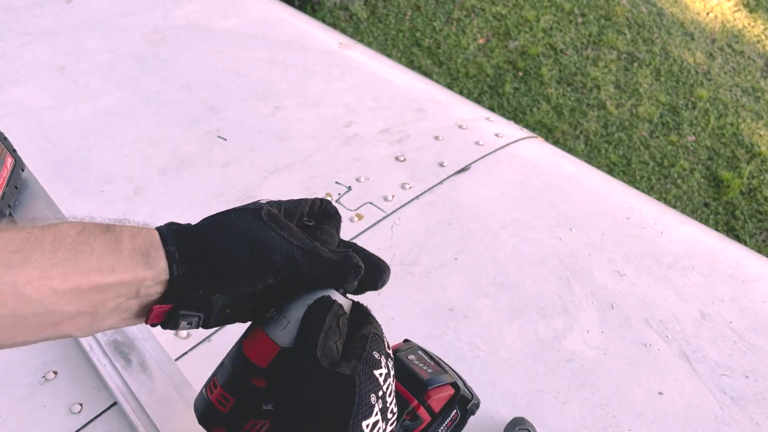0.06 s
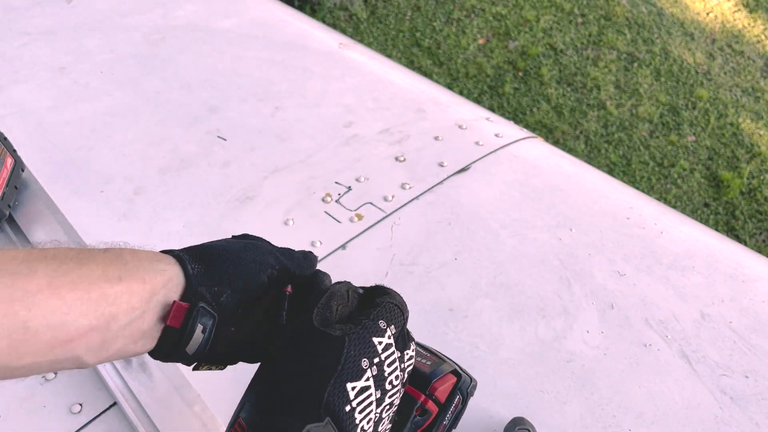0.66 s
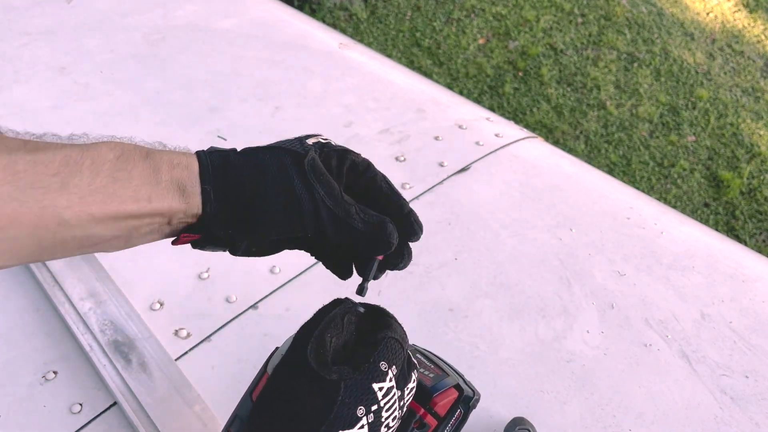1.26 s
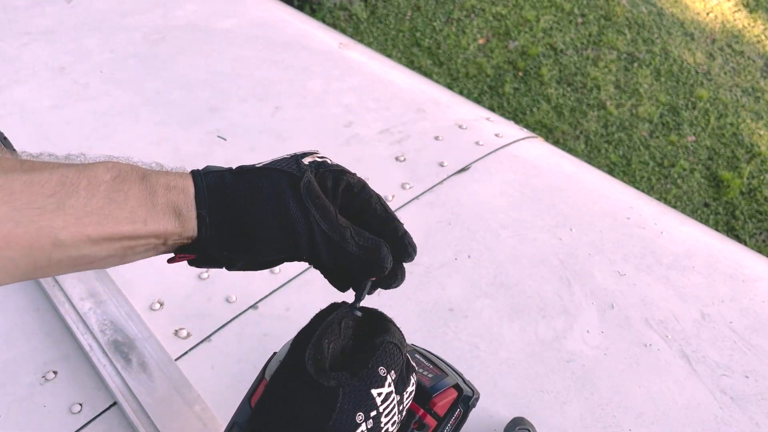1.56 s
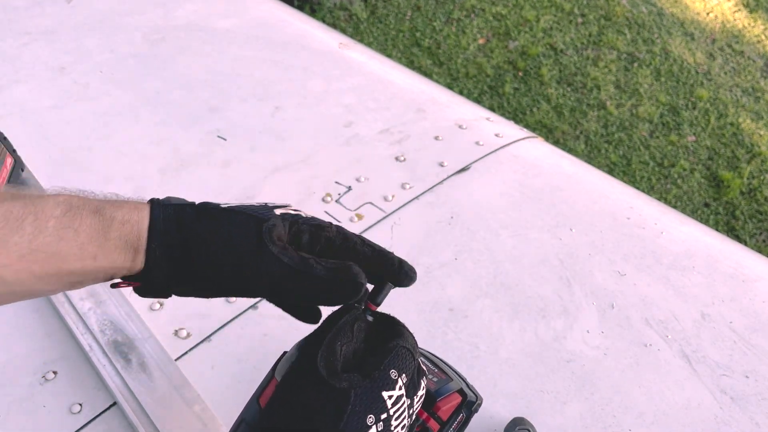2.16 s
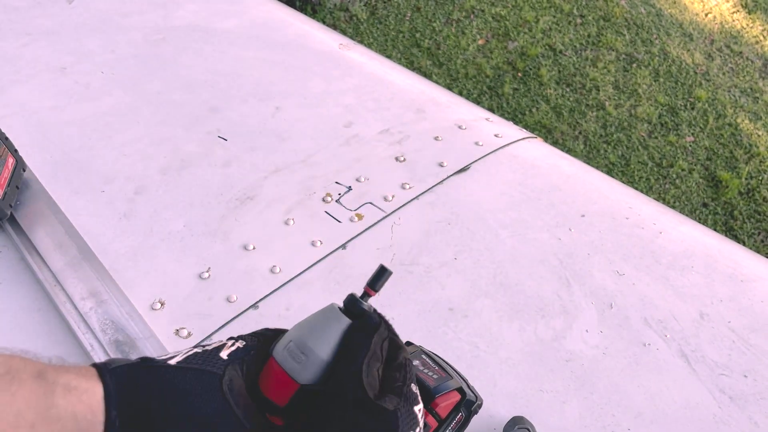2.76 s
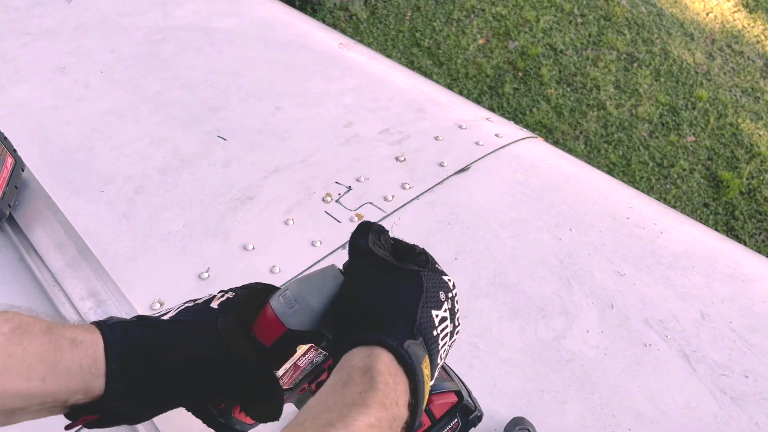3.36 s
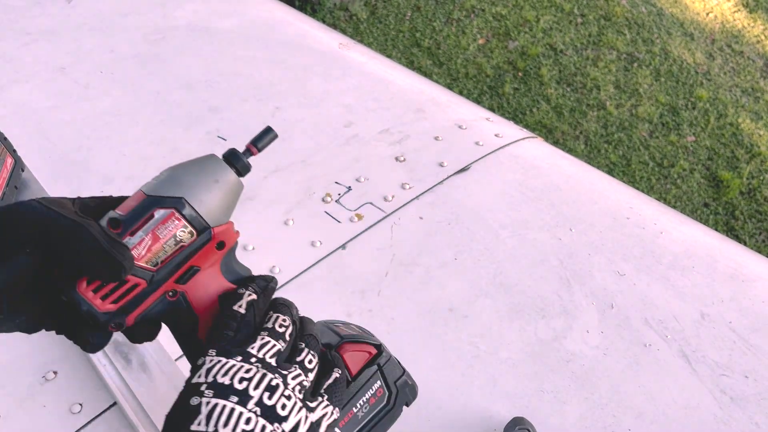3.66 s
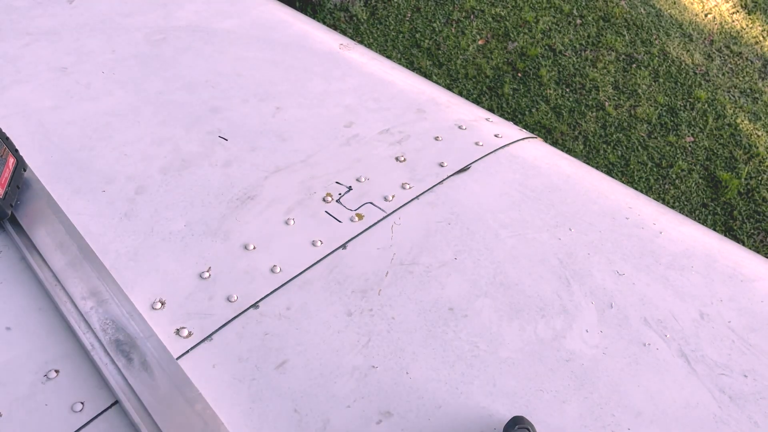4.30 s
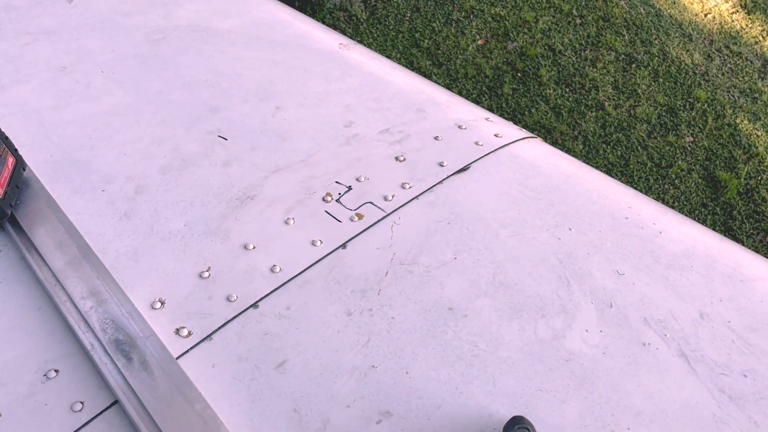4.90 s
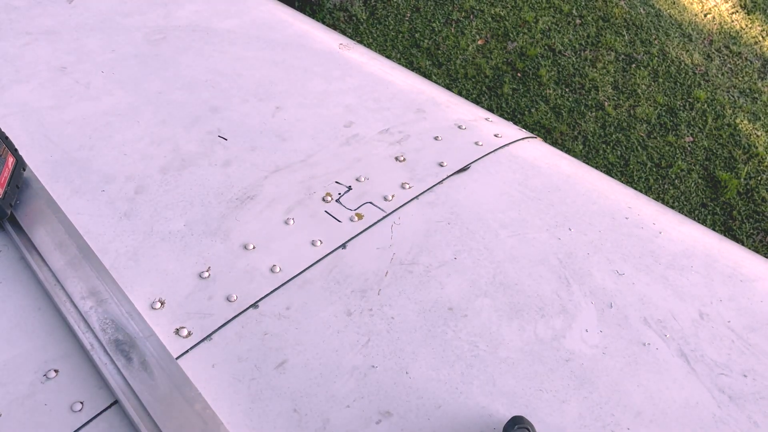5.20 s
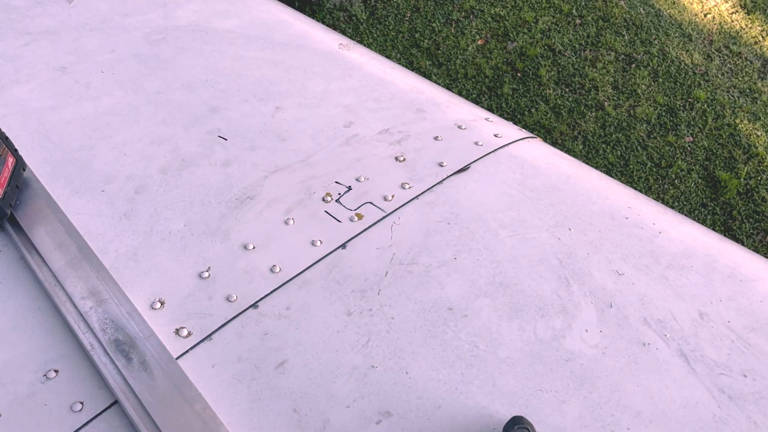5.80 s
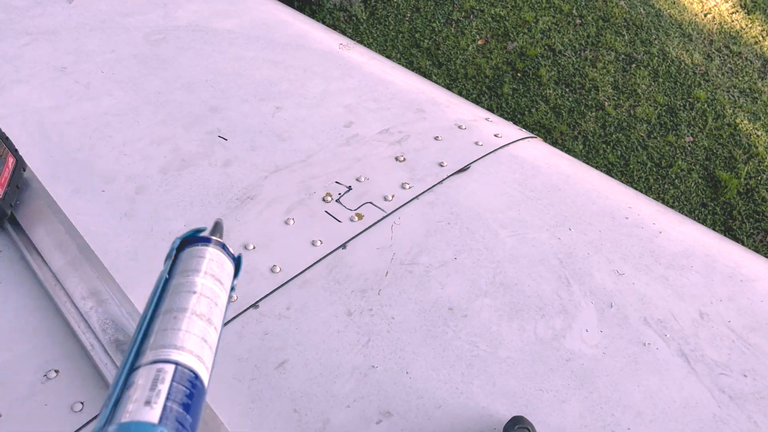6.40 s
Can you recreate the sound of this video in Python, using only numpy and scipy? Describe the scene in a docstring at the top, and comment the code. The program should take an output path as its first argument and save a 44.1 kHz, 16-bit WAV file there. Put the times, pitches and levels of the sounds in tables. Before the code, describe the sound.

Close, low thuds and cloth rubbing run throughout as someone moves on a metal roof, heard through the panel itself. Slightly left, small steel clicks and a bright snap mark an adapter locking into a cordless driver. The tool later knocks down heavily on the sheet, and a caulking gun is lifted, rattling, ending in a sharp snap and hollow ring. Soft outdoor air and a faint cricket lie behind.

```python
"""A quiet garden with a trilling cricket lies behind a sheet-metal roof. A cordless impact driver knocks on
the panel; gloves and sleeves rustle, and every shift of weight sends dull bumps through the roof into the
microphone standing on it. From 1.5 s a socket adapter clicks into the steel chuck and the sleeve snaps
shut; thin whistles drift in from afar. Near 4.7 s the driver is laid down and the sheet buzzes. Under faint
far calls a caulking gun is lifted, rattling; from 6 s its catch snaps and its plunger hits the cartridge."""
import sys
import numpy as np
from scipy import signal
from scipy.fft import rfft, irfft
from scipy.io import wavfile
from scipy.ndimage import uniform_filter1d

SR = 44100
rng = np.random.default_rng(int(sys.argv[2]) if len(sys.argv) > 2 else 0)


def generate_wav(sig):
    """Save sig (samples, or channels by samples) to the path in sys.argv[1] as 16-bit PCM at SR."""
    pcm = np.round(np.clip(np.atleast_2d(sig).T, -1, 1) * 32767).astype(np.int16)
    wavfile.write(sys.argv[1], SR, pcm)


N = 284445


def amp(db):
    """Decibels to gain."""
    return 10 ** (np.asarray(db) / 20)


def unit_rms(x):
    """Scales to rms 1."""
    return x / np.sqrt(np.mean(x ** 2) + 1e-20)


def curve(points, hz):
    """Reads a table of (frequency, value) on a log-frequency axis."""
    f, value = np.transpose(points)
    return np.interp(np.log(hz + 1), np.log(f + 1), value)


def add(mix, s, sound):
    """Mixes a sound in at time s."""
    start = max(round(s * SR), 0)
    part = mix[..., start:start + sound.shape[-1]]
    part += sound[..., :part.shape[-1]]


def band(x, lo_hz, hi_hz, order=2):
    """Causal band-pass."""
    return signal.sosfilt(signal.butter(order, [lo_hz, hi_hz], "band", fs=SR, output="sos"), x)


def drift(smooth_samples, n=N):
    """A smooth random modulator, rms 1."""
    return unit_rms(uniform_filter1d(rng.standard_normal(n), size=smooth_samples))


def swells(rows):
    """An envelope of smooth swells, from rows of middle t/s, length/s, level/dB."""
    t = np.arange(0, N, 64) / SR
    gain = sum(amp(db) * np.cos(np.pi * np.clip((t - middle) / length, -.5, .5)) ** 2
               for middle, length, db in rows)
    return np.interp(np.arange(N) / SR, t, gain)


def stereo_noise(colour):
    """Noise of a given spectrum, partly alike left and right."""
    # stereo image: f/Hz, left-right likeness
    image = [(60, 0.69), (130, 0.36), (280, 0.83), (600, -0.06), (1290, 0.36), (2770, 0.33), (5960, 0.47),
             (12800, 0.57)]
    hz = np.fft.rfftfreq(N, 1 / SR)
    mid, side = rfft(rng.standard_normal((2, N)))
    likeness = np.clip(curve(image, hz), 0, 1)
    pair = np.sqrt(1 + likeness) * mid + np.array([[1], [-1]]) * np.sqrt(1 - likeness) * side
    return unit_rms(irfft(pair * amp(curve(colour, hz)), N))


def narrow_noise(hz, width_hz):
    """A band of noise that follows the pitch curve hz, rms 1."""
    lowpass = signal.butter(2, width_hz, fs=SR, output="sos")
    hoarse = signal.sosfilt(lowpass, rng.standard_normal((len(hz), 2)) @ [1, 1j])
    return unit_rms((hoarse * np.exp(2j * np.pi * np.cumsum(hz) / SR)).real)


def strikes(hits, modes, crack_db, crack_t60, lo_hz, hi_hz, tail_db, tail_t60, gain_db=0):
    """Blows ring an object's modes; its many lesser modes give a crack and a short, softer tail."""
    out, t = np.zeros((2, N)), np.arange(SR // 3) / SR
    mode_hz, mode_db, t60 = np.transpose(modes)[:, :, None]
    octaves = np.log2(np.clip(np.fft.rfftfreq(len(t), 1 / SR), 300, 13000) / 3000)
    notes = amp(mode_db - 60 * t / t60) * np.sin(2 * np.pi * mode_hz * t)
    attack, fade = 1 - np.exp(-t / 0.00046), np.minimum(1, 20 * (1 - t / t[-1]))
    for s, db, tilt_db in hits:
        sign = rng.choice([-1, 1], mode_hz.shape)  # where the blow lands
        ring = (sign * notes).sum(0)
        grit = rng.standard_normal((3, len(t)))
        crack = unit_rms(band(grit[0], lo_hz, hi_hz)) * amp(crack_db - 60 * t / crack_t60)
        dull_grit = band(grit[0] + 0.46 * grit[1:], lo_hz / 2, hi_hz / 2, order=1)
        tail = unit_rms(dull_grit) * amp(tail_db - 60 * t / tail_t60)
        hit = np.roll((ring + crack + tail) * attack, len(t) // 400, axis=1)  # room for the tilt's pre-ring
        hit = irfft(rfft(hit) * amp(tilt_db * octaves), len(t))
        loudest = np.sqrt(2 * uniform_filter1d(hit.mean(0) ** 2, size=40).max())
        add(out, s - 1 / 1200, amp(db + gain_db) * hit / loudest * fade)
    return out


def bending_waves(jolts, dispersion=0.1274, rolloff=4.44, roughness=0.4, sway_hz=82, sway_octaves=0.51):
    """High bending waves outrun low ones, so each jolt arrives falling in pitch and ends in a low sway."""
    size = 2 ** 13
    out, f = np.zeros(N + size), np.fft.rfftfreq(size, 1 / SR) + 1
    for (s, db, hz, sway_db), chance in zip(jolts, rng.uniform(-1, 1, (400, 9))):
        path = dispersion * np.exp(.5 * chance[0])  # the delay is path / sqrt(f)
        centre_s = size / SR / 2 - path / np.sqrt(hz)
        travel = np.exp(-2j * np.pi * (2 * path * np.sqrt(f) + f * centre_s + chance[1]))
        slip_cycles = np.outer(f, 0.007255 * chance[3:6]) + chance[6:]  # lesser slips around the main one
        slips = 1 + roughness * np.exp(-2j * np.pi * slip_cycles).sum(1)
        low_cut = (f / hz) ** 2 / (1 + (f / hz) ** 2)
        knock = slips * low_cut / (1 + (f / (1.003 * hz)) ** rolloff) / (1 + (f / (3 * hz)) ** 4)
        sway = np.exp(-.5 * (np.log2(f / sway_hz) / sway_octaves + .5 * chance[2]) ** 2)
        for shape, peak_db in ((knock, db), (sway, sway_db)):
            wave = irfft(shape * travel, size)
            add(out, s, amp(peak_db) * wave / abs(signal.hilbert(wave)).max())
    return out[size // 2:][:N]


def through_sheet(slips, colour, dispersion):
    """The sheet colours each slip and smears it into a falling chirp; rms 1."""
    hz = np.fft.rfftfreq(N, 1 / SR)
    travel = np.exp(-4j * np.pi * dispersion * np.sqrt(hz))
    return unit_rms(irfft(rfft(slips) * amp(curve(colour, hz)) * travel, N))


def effort(attack_s=0.037, release_s=0.062):
    """How hard the body moves: each spell builds up, holds and settles."""
    # spells of moving about on the roof: t/s, length/s, level/dB
    moves = [(0.0, 0.08, -37), (0.311, 0.1, -49), (0.639, 0.5, -41), (1.16, 0.26, -44), (1.598, 0.22, -40),
             (1.845, 0.24, -46), (2.27, 0.04, -43), (2.45, 0.2, -34), (2.687, 0.05, -38),
             (2.967, 0.39, -42), (3.45, 0.58, -42), (4.33, 0.2, -52), (4.702, 0.39, -34.5),
             (5.15, 0.28, -44.5), (5.49, .22, -40), (5.77, .11, -37), (6.17, 0.19, -42)]
    t = np.arange(0, N, 64) / SR
    spells = [amp(db) * np.exp(np.minimum(t - s, 0) / attack_s - np.maximum(t - s - length, 0) / release_s)
              for s, length, db in moves]
    return np.interp(np.arange(N) / SR, t, np.max(spells, axis=0))


def garden(air_db=-51.5, insects_db=-62):
    """The bed: open air and a steady high chorus of far insects."""
    # colour of the air: f/Hz, level/dB
    air = [(35, -16.5), (65, 0), (110, -7), (290, -21), (380, -19), (520, -25), (800, -24), (1300, -31.5),
           (2200, -35), (4000, -35), (6050, -32.5), (6400, -27), (6800, -33.5), (7400, -29), (8500, -26.5),
           (9700, -55), (10800, -32.5), (12000, -65), (13000, -78)]
    # colour of the chorus: f/Hz, level/dB
    insects = [(6500, -43), (7700, -17), (8250, 5), (8550, 6.5), (8900, 3.5), (9500, 2.5), (9900, -6.5),
               (10300, -50), (11000, -76)]
    return amp(air_db) * stereo_noise(air) + amp(insects_db) * stereo_noise(insects)


def steel_rings():
    """A freely ringing steel part holds one dying note."""
    # notes: t/s, level/dB, f/Hz, t60/s
    notes = [(0, -24, 279.5, 0.22), (0, -39, 786, 0.27), (0, -57, 5340, 1.0), (3.141, -36.5, 1980, 0.018),
             (3.145, -51, 810, 0.086), (3.152, -24.5, 4640, 0.006), (3.152, -46, 4630, 0.048),
             (6.301, -41.5, 7100, 0.27), (6.302, -28, 5880, 0.051)]
    out, t = np.zeros(N), np.arange(SR) / SR
    for s, db, hz, t60 in notes:
        add(out, s, amp(db - 60 * t / t60) * np.sin(2 * np.pi * hz * t))
    return out


def driver_knocks():
    """The driver knocks on the roof, and tool and panel ring together."""
    # knocks: t/s, level/dB, tilt/(dB per octave)
    hits = [(0.001, -27.5, -0.5), (0.012, -17, -9.5), (0.033, -29, -10), (4.7213, -24, -4),
            (4.7677, -9, -4.5), (4.806, -18.5, -10), (4.819, -34, 3), (4.917, -29.5, -9.5),
            (4.9285, -23, -9.5), (4.9375, -19, -13)]
    # modes of driver and panel: f/Hz, level/dB, t60/s
    modes = [(210, -3, 0.22), (316, -7, 0.14), (346.3, -8.5, 0.34), (411, -16, 0.79), (476, 5, 0.042),
             (619, -1.5, 0.062), (733, -1, 0.052), (920, -3, 0.02), (1390, 17.5, 0.0094),
             (1670, -12, 0.017), (2710, 0.5, 0.086), (2745, -19.5, 0.019), (2960, 4.5, 0.045)]
    return strikes(hits, modes, crack_db=18.5, crack_t60=0.014, lo_hz=470, hi_hz=2580,
                   tail_db=3.5, tail_t60=0.25, gain_db=-2.5)


def cloth_rub(gain_db=-1, slips_per_s=110, spread_db=2.5, dull_hz=150, brighten_db=-41):
    """Cloth drags over the sheet in small slips above a low rumble; gentle dragging is duller."""
    # colour of the rub: f/Hz, level/dB
    colour = [(15, -69), (25, -13.5), (58, 5), (97, 2), (135, 1), (234, -8), (380, -14), (412, -25.5),
              (469, -23), (608, -30), (1200, -47.5), (1560, -77), (2640, -120)]
    hz, push = np.fft.rfftfreq(N, 1 / SR), effort()
    slips = rng.choice([-1, 1], N) * (rng.random(N) < slips_per_s / SR)
    strength = amp(spread_db * np.minimum(rng.exponential(1, N), 3))
    full = through_sheet(slips * strength, colour, dispersion=0.118) + 1.15 * stereo_noise(colour)
    dull = irfft(rfft(full) / (1 + (hz / dull_hz) ** 4), N)
    brightness = np.tanh(push / amp(brighten_db))
    return amp(gain_db) * push * (brightness * full + (1 - brightness) * dull)


def rustle(fabric_db=-2, grain=0.24):
    """Fabric brushes on fabric and the glove's rubber grip fizzes on the tool, both catching unevenly."""
    # strokes of glove and sleeve: middle t/s, length/s, level/dB
    brushes = [(.21, 0.88, -53.5), (2.025, 0.46, -56.5), (2.68, 1, -57), (3.25, 0.74, -57),
               (3.67, 0.99, -56), (4.42, 0.7, -58.5), (5.089, 0.39, -54), (5.784, 1, -54.5),
               (6.344, 0.85, -56.5)]
    # colour of the fabric: f/Hz, level/dB
    fabric_colour = [(600, 3), (1300, -6.5), (2000, -3), (2600, -1), (3500, -11.5), (4800, -0.5),
                     (6000, -9), (9000, -1.5), (11000, -20), (12500, -42), (13300, -62)]
    # fizzes of the grip: middle t/s, length/s, level/dB
    fizzes = [(.22, .4, -65), (.85, .6, -77), (2.66, .4, -74), (3.55, .95, -69.5)]
    # colour of the fizz: f/Hz, level/dB
    fizz_colour = [(8000, -19), (10300, -16), (11000, -2), (11500, 6), (12100, -6), (12700, -35),
                   (13300, -60)]
    catching = np.exp(grain * drift(300))
    fabric = amp(fabric_db) * swells(brushes) * stereo_noise(fabric_colour)
    grip = swells(fizzes) * stereo_noise(fizz_colour)
    return catching * (fabric + grip)


def lesser_bumps(per_s=22, usual_hz=239.6, usual_effort_db=-40, octaves_per_db=-0.16, sway_db=-6.5):
    """The moving body jolts the roof at uneven intervals; more effort makes it stronger and lower."""
    slots = np.arange(0, N / SR, 1 / per_s)
    timing, strength, detune = rng.uniform(-1, 1, (400, 3))[:len(slots)].T
    s = np.clip(slots + .5 * timing / per_s, 0, (N - 1) / SR)
    effort_db = 20 * np.log10(effort()[(s * SR).astype(int)])
    db = effort_db + 3.5 + 0.5 * strength
    hz = usual_hz * 2 ** (octaves_per_db * (effort_db - usual_effort_db) + 0.16 * detune)
    return bending_waves(np.transpose([s, db, hz, db + sway_db]))


def glove_slides(width_hz=400, rise_hz_per_s=800):
    """Ribbed glove fabric hisses as it slides, higher as it speeds up."""
    # slides: middle t/s, length/s, level/dB, f/Hz
    slides = [(.2, .35, -65, 5700), (3.69, .55, -63, 4800)]
    out, t = np.zeros(N), np.arange(N) / SR
    for middle, length, db, hz in slides:
        rising_hz = hz + rise_hz_per_s * np.clip(t - middle, -length, length)
        out += swells([(middle, length, db)]) * narrow_noise(rising_hz, width_hz)
    return out


def cricket(strokes_per_s=66, fall_hz=600, duty=0.55, unsteady=.03, waver_hz=90):
    """Each wing stroke scrapes out a short tone that sags in pitch; strokes come in swelling trills."""
    # trills: middle t/s, length/s, level/dB, f/Hz
    trills = [(.18, 0.26, -59.5, 8650), (0.677, 0.75, -63.5, 8560), (1.358, 0.79, -64, 8530),
              (2.235, 0.41, -61, 8540), (2.729, 0.49, -60.5, 8430), (3.32, 0.55, -62.5, 8580),
              (3.97, 0.66, -61.5, 8530), (4.503, 0.45, -64, 8430), (4.774, 0.3, -60, 8360),
              (5.363, 0.54, -61, 8600), (5.84, 0.39, -58.5, 8530), (6.23, 0.15, -63, 8650)]
    pace = strokes_per_s * (1 + unsteady * drift(60))
    stroke = np.cumsum(pace) / SR % 1 / duty  # the wing sounds from 0 to 1
    middle, _, _, pitch = np.transpose(trills)
    hz = np.interp(np.arange(N) / SR, middle, pitch) + fall_hz * (.5 - stroke) + waver_hz * drift(60)
    song = np.sin(np.pi * np.minimum(stroke, 1)) * np.sin(2 * np.pi * np.cumsum(hz) / SR)
    return swells([trill[:3] for trill in trills]) * unit_rms(song)


def firm_bumps():
    """Knees and tools thud on the roof and set the sheet swaying."""
    # bumps: t/s, level/dB, f/Hz, sway level/dB
    jolts = [(0.404, -40.5, 229, -46), (0.786, -15, 207, -35), (0.842, -19.5, 378, -47),
             (0.853, -17.5, 372, -20), (0.969, -19.5, 359, -21.5), (0.982, -23.5, 268, -32),
             (1.053, -25, 237, -32), (1.272, -24, 195, -24.5), (1.635, -31, 280, -41),
             (1.693, -21, 219, -25), (1.707, -24.5, 177, -24), (1.75, -29.5, 216, -36),
             (1.786, -24.5, 346, -25), (2.287, -37, 197, -43), (2.46, -20.5, 256, -33),
             (2.495, -24, 310, -42), (2.483, -43, 170, -35), (2.541, -23, 356, -38), (2.555, -26, 171, -29),
             (2.575, -21, 262, -18), (2.613, -21, 313, -32), (2.648, -40, 221, -30),
             (2.747, -34.5, 231, -39), (3.213, -25.5, 280, -32), (3.263, -23, 342, -31),
             (3.322, -27, 355, -19.5), (3.439, -29.5, 298, -40), (3.464, -28, 278, -47),
             (3.526, -30.5, 304, -43), (3.712, -25.5, 290, -35), (3.8, -25, 393, -31.5),
             (4.014, -41, 188, -35.5), (4.737, -25, 333, -38), (4.815, -17.5, 275, -55),
             (4.837, -17, 228, -53), (4.903, -20.5, 248, -34), (4.922, -17, 300, -22),
             (4.968, -23, 443, -23), (5, -20, 293, -26), (5.054, -24.5, 262, -24.5), (5.117, -24, 306, -46),
             (5.197, -26, 215, -30), (5.259, -51, 148, -24.5), (5.378, -41, 171, -27.5),
             (5.505, -23, 194, -24.5), (5.594, -22.5, 350, -38), (5.645, -17.5, 319, -30.5),
             (5.686, -24, 400, -28.5), (5.803, -20.5, 380, -42), (5.818, -19.5, 280, -32),
             (5.836, -13, 524, -30), (5.864, -20, 370, -22.5), (6.205, -20.5, 270, -29)]
    return bending_waves(jolts)


def chuck_clicks():
    """Steel on steel: the adapter clicks about in the chuck."""
    # clicks: t/s, level/dB, tilt/(dB per octave)
    hits = [(1.5345, -26, -5.5), (1.5522, -30, 7), (1.7245, -25.5, -16.5), (1.7330, -37, -9),
            (1.9112, -30, -7), (2.131, -39.5, -8.5), (2.5761, -35, 6), (2.689, -33.5, 3), (3.1417, -27, 2),
            (3.1520, -30.5, -2.5), (3.1922, -35.5, 0), (3.945, -37, -3), (4.41, -41.5, -4)]
    # modes of the chuck: f/Hz, level/dB, t60/s
    modes = [(787, -22, 0.065), (1357, -0.5, 0.018), (1980, -16, 0.028), (3200, -17, .01),
             (4580, -2.5, 0.023), (4980, 1, 0.014), (5730, -3, 0.0088), (7460, 23.5, 0.0016),
             (8840, 10.5, 0.0065), (9800, -6, 0.0098), (11640, 5, 0.0044)]
    return strikes(hits, modes, crack_db=10, crack_t60=0.0041, lo_hz=1640, hi_hz=10300,
                   tail_db=-10, tail_t60=0.1, gain_db=-5)


def hard_jolts():
    """Each hard contact sends one clean, quick chirp through the sheet."""
    # contacts: t/s, level/dB, f/Hz, sway level/dB
    jolts = [(1.5365, -38, 1344, -58), (1.5545, -39, 1400, -59), (1.6428, -11.5, 397, -31),
             (1.652, -18, 485, -25), (1.663, -23, 550, -18), (1.6705, -15.5, 334, -20),
             (1.686, -24, 510, -33), (1.701, -34, 520, -32), (3.1455, -34.5, 890, -55),
             (4.7225, -27, 914, -47), (4.7695, -21, 887, -43), (4.775, -21, 400, -41),
             (4.783, -20.5, 500, -44), (4.851, -22, 415, -38), (4.9305, -14.5, 490, -27),
             (4.9385, -15, 407, -34)]
    return bending_waves(jolts, dispersion=0.1402, rolloff=4.42, roughness=0.044)


def scrapes(slips_per_s=170, unsteady=.6, spread_db=1):
    """A tool or knee sticks and slips on the sheet in a dense, uneven train of small jolts."""
    # drags: middle t/s, length/s, level/dB
    drags = [(1.68, 0.092, -29), (2.53, 0.052, -28), (2.575, 0.074, -33), (2.635, 0.082, -36.5),
             (2.69, 0.033, -40.5), (5.005, 0.046, -25.5), (5.1, .06, -36.5), (5.845, 0.06, -37)]
    # colour of the scrape: f/Hz, level/dB
    colour = [(60, -25), (150, 9), (280, 4), (450, -0.5), (620, -10), (900, -31), (1400, -39), (2600, -90)]
    pace = slips_per_s * np.exp(unsteady * drift(200))
    slips = np.diff(np.floor(np.cumsum(pace) / SR), prepend=0)
    slips *= amp(-spread_db * rng.standard_normal(N))
    return swells(drags) * through_sheet(slips - slips.mean(), colour, dispersion=0.1284)


def sleeve_snap():
    """The chuck's sleeve snaps shut on the adapter, short and bright."""
    # snaps: t/s, level/dB, tilt/(dB per octave)
    hits = [(1.9249, -16, 0.5), (1.9261, -29, -5), (1.9345, -38, -2)]
    # modes of the sleeve: f/Hz, level/dB, t60/s
    modes = [(2140, -18, .008), (4500, -3.5, 0.0096), (4910, -7, 0.018), (5370, -26, 0.06),
             (8660, 7, 0.007), (10900, -2, .009), (11500, 8, 0.011), (12500, 13.5, .005)]
    return strikes(hits, modes, crack_db=-1.5, crack_t60=0.0097, lo_hz=1500, hi_hz=12600,
                   tail_db=-35, tail_t60=0.074)


def far_whistles(waver_hz=65):
    """Each far whistle is one thin, wavering note that swells and fades."""
    # whistles: middle t/s, length/s, level/dB, f/Hz
    notes = [(2.29, .55, -66.5, 5200), (3.05, .8, -74, 4720)]
    waver = waver_hz * drift(260)
    return sum(swells([swell]) * np.sin(2 * np.pi * np.cumsum(hz + waver) / SR) for *swell, hz in notes)


def sheet_buzz():
    """The sheet buzzes under the driver as its close-set modes beat."""
    # blow: t/s, level/dB, tilt/(dB per octave)
    hits = [(4.7785, -20.5, -10)]
    # modes of the sheet: f/Hz, level/dB, t60/s
    modes = [(1676, -12, 0.097), (1770, -3, 0.09), (1860, -9.5, 0.13), (1911, -11, 0.09),
             (2020, -10, 0.067)]
    return strikes(hits, modes, crack_db=-5, crack_t60=0.035, lo_hz=1540, hi_hz=3470,
                   tail_db=-31, tail_t60=0.11)


def far_calls(call_s=0.3, width_hz=90, waver_hz=35):
    """Faint, hoarse calls, each a wavering band of noise that rises and falls."""
    # calls: t/s, level/dB, nominal f/Hz
    calls = [(5.04, -69, 1500), (5.36, -63.5, 1460), (5.68, -67.5, 1520), (5.98, -64, 1490)]
    out, n = np.zeros(N), round(call_s * SR)
    arch = .94 + 0.0345 * np.sin(np.pi * np.linspace(0, 1, n))
    for s, db, hz in calls:
        voice = narrow_noise(hz * arch + waver_hz * drift(1500, n), width_hz)
        add(out, s, amp(db) * voice * signal.windows.tukey(n, .9))
    return out


def frame_rattle():
    """The caulking gun's frame rattles as it is lifted."""
    # rattles: t/s, level/dB, tilt/(dB per octave)
    hits = [(5.596, -38, 3), (5.6078, -15, -3.5), (5.6112, -18.5, -8), (5.6375, -47, 13), (5.644, -35.5, 2),
            (5.876, -20.5, -16.5)]
    # modes of the frame: f/Hz, level/dB, t60/s
    modes = [(1170, -31, 0.016), (1640, -19, 0.026), (2350, 4, 0.01), (2590, 3, 0.032), (3180, -2, 0.025),
             (4050, -24, .03), (5170, -5, 0.051), (6020, -5, .04), (6730, -0.5, 0.04), (8700, 9, 0.0087),
             (10100, -15, .012)]
    return strikes(hits, modes, crack_db=10.5, crack_t60=0.013, lo_hz=1040, hi_hz=7500,
                   tail_db=-5.5, tail_t60=0.099, gain_db=-4)


def cartridge_knocks():
    """The plunger hits the cartridge, which rings low and hollow."""
    # knocks: t/s, level/dB, tilt/(dB per octave)
    hits = [(6.002, -34, -4.5), (6.2985, -14.5, -12), (6.302, -19.5, -8), (6.309, -29, -2),
            (6.317, -26.5, -3)]
    # modes of the cartridge: f/Hz, level/dB, t60/s
    modes = [(243, -34, 0.044), (311.6, -13.5, 0.17), (431, -4, 0.16), (485.5, -23, 0.72),
             (520, -1.5, 0.15), (670, -30, 0.049), (844, -7, 0.28), (990, -3, 0.1), (1120, -21, 0.14),
             (1227, 3, 0.09), (1780, -10, .08)]
    return strikes(hits, modes, crack_db=8.5, crack_t60=0.081, lo_hz=398, hi_hz=2520,
                   tail_db=-9.5, tail_t60=0.5, gain_db=-3)


def catch_snaps():
    """The plunger's catch snaps with a high, tight ring."""
    # snaps: t/s, level/dB, tilt/(dB per octave)
    hits = [(6.0068, -19.5, -2.5), (6.2980, -16.5, -7.5), (6.3008, -6.5, 4.5)]
    # modes of the catch: f/Hz, level/dB, t60/s
    modes = [(3100, -18, 0.026), (3440, -10, 0.017), (3770, -15, 0.031), (5000, -15.5, 0.032),
             (6030, -7.5, 0.018), (6900, -10, .015), (8710, 4, 0.017), (9100, -6, 0.024), (9750, 0, 0.0088),
             (10960, -1, 0.0085), (11530, -13, 0.033)]
    return strikes(hits, modes, crack_db=-15, crack_t60=0.038, lo_hz=2560, hi_hz=9800,
                   tail_db=-26, tail_t60=0.15, gain_db=-3.5)


def from_left(x, top_hz=12500):
    """Close sounds reach the left microphone port earlier and mostly stronger; the ports dull the top."""
    # balance: f/Hz, left over right/dB
    balance = [(100, 5), (300, -1), (600, 2.5), (1200, 1.5), (2200, 3), (4500, 7), (6700, 10.5), (8000, 18),
               (8700, -1), (12000, 0)]
    # phase: f/Hz, left lead/rad
    lead = [(100, 0.11), (300, 0.6), (600, 1.3), (1200, 1.6), (2500, 0.92), (4500, 0.91), (8700, 0.87),
            (11500, 2.2)]
    hz = np.fft.rfftfreq(N, 1 / SR)
    half = amp(curve(balance, hz) / 2) * np.exp(.5j * curve(lead, hz))
    dulled = rfft(x) / (1 + (hz / top_hz) ** 20)
    return irfft(dulled * np.array([half, 1 / half]), N)


def from_garden(x, left_db=2, lead_rad=0.15):
    """Far high notes reach both ports almost alike, the left a little earlier and stronger."""
    half = amp(left_db) * np.exp(1j * lead_rad)
    return (signal.hilbert(x) * np.array([[half], [1 / half]])).real


def through_case(x, side_db=-10, left_db=1):
    """Jolts rock the microphone's case, shaking its two ports a little differently from moment to moment."""
    rocking = signal.filtfilt([.01], [1, -.99], np.exp(1j * drift(3000)))
    side = amp(side_db) * (1j * signal.hilbert(x) * rocking).real
    return np.array([x * amp(left_db) + side, x * amp(-left_db) - side])


def scene():
    """Tools close on the left, jolts through the roof, and the garden behind."""
    driver = chuck_clicks() + sleeve_snap() + driver_knocks() + sheet_buzz()
    caulking_gun = frame_rattle() + catch_snaps() + cartridge_knocks()
    jolts = firm_bumps() + lesser_bumps() + hard_jolts() + scrapes()
    close = from_left(driver + caulking_gun + steel_rings() + glove_slides())
    distant = from_garden(cricket() + far_whistles())
    return close + distant + through_case(jolts) + cloth_rub() + rustle() + garden() + far_calls()


def record(dry, edge_hz=13300):
    """A steep high cut on the whole mix."""
    lowpass = signal.firwin(201, edge_hz, window=("kaiser", 9), fs=SR)
    return signal.oaconvolve(dry, lowpass[None], "same")


dry = scene()
out = record(dry)
generate_wav(out)
```